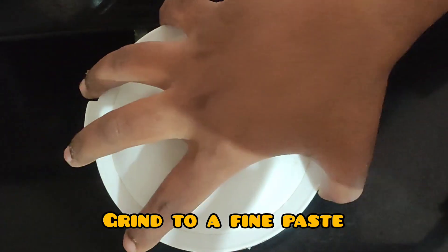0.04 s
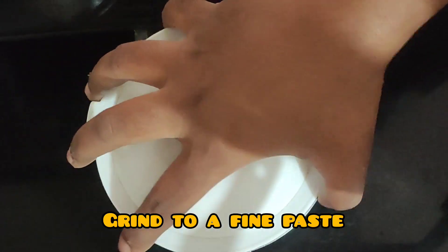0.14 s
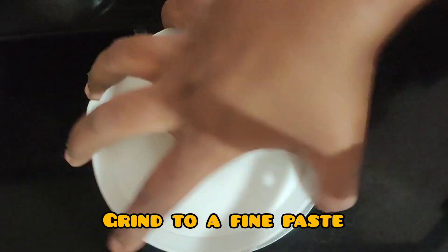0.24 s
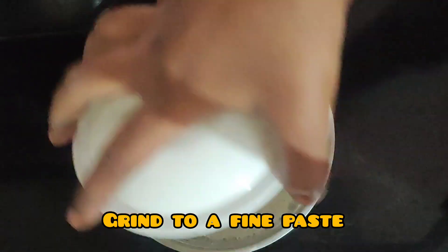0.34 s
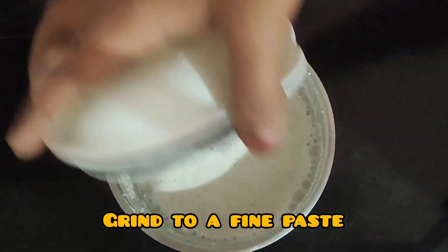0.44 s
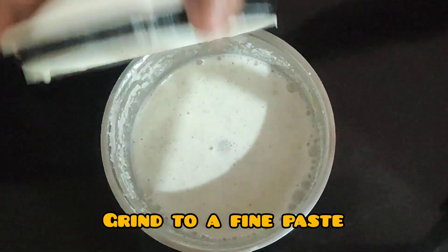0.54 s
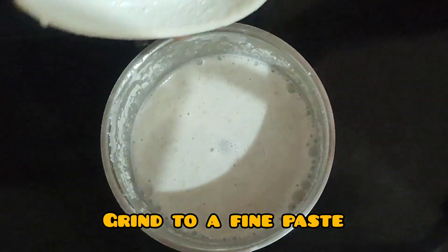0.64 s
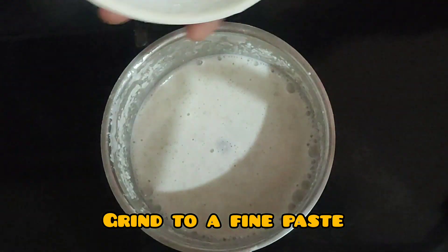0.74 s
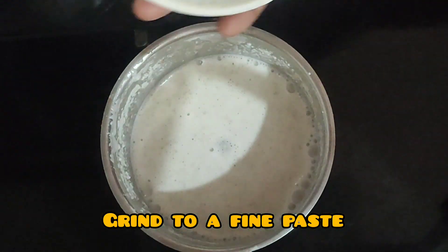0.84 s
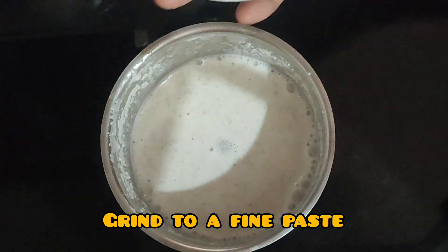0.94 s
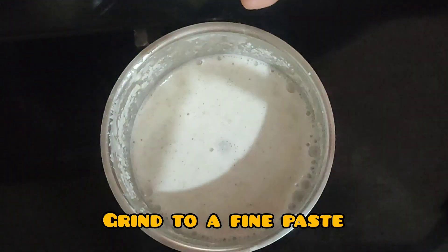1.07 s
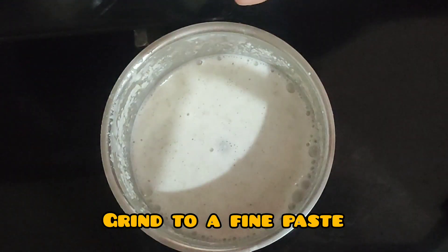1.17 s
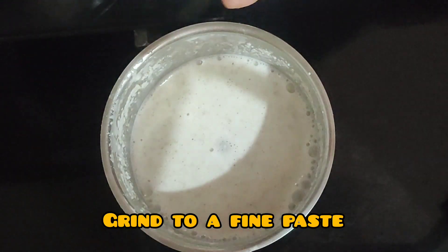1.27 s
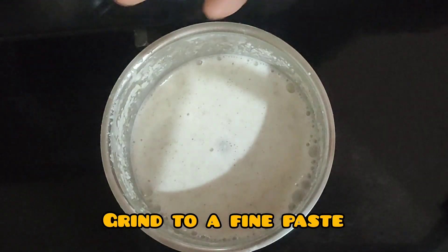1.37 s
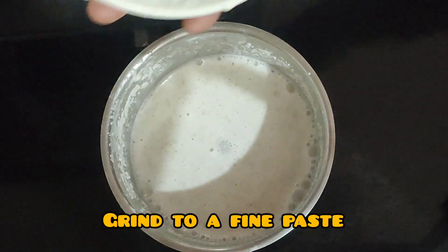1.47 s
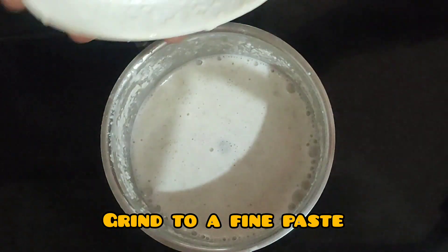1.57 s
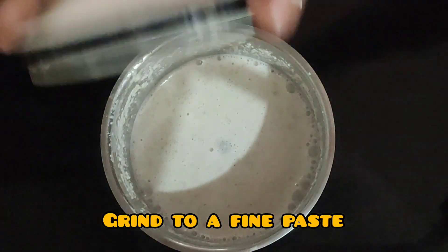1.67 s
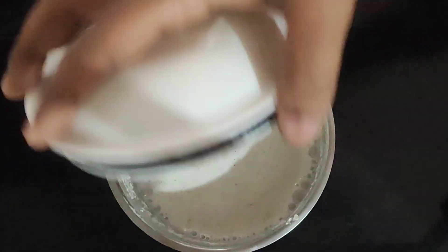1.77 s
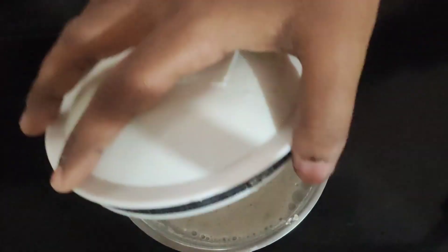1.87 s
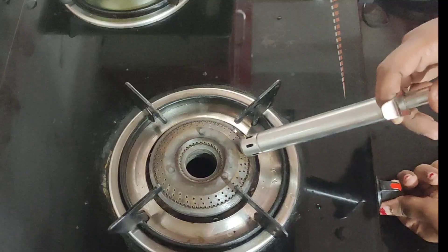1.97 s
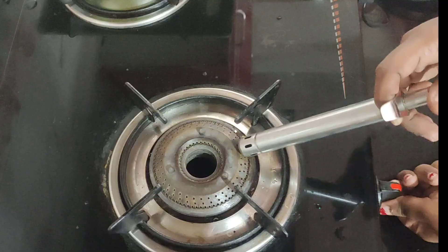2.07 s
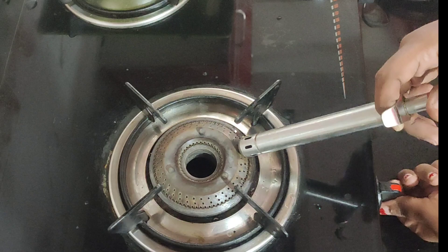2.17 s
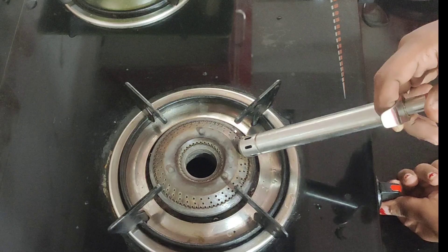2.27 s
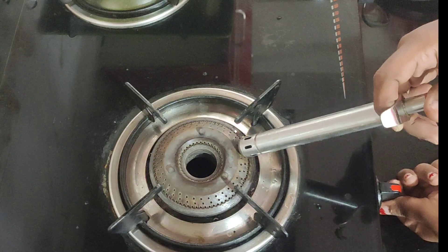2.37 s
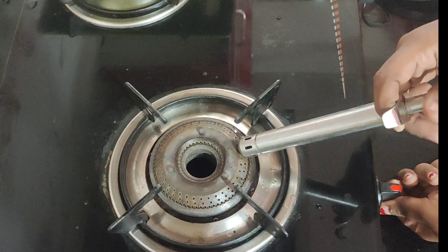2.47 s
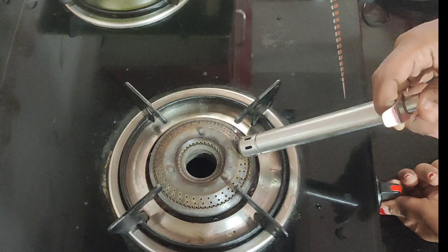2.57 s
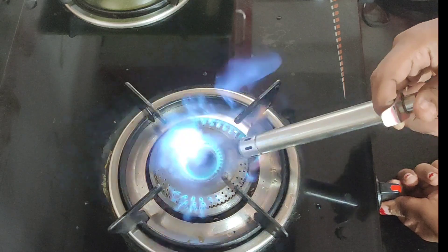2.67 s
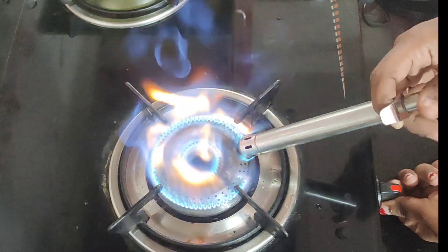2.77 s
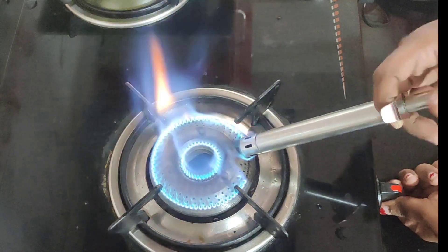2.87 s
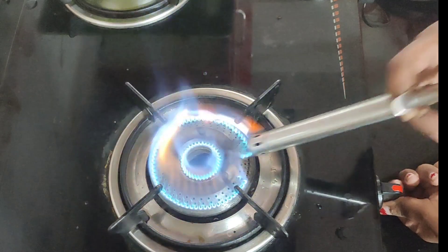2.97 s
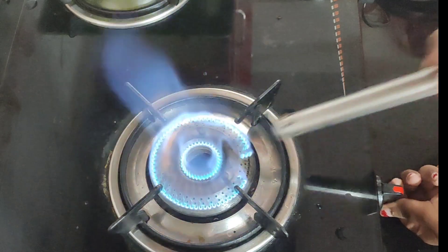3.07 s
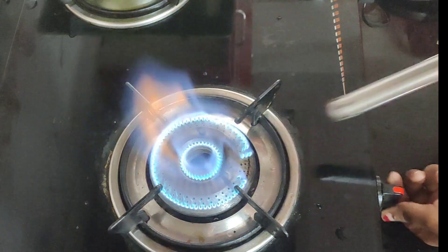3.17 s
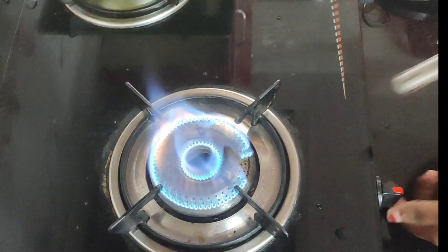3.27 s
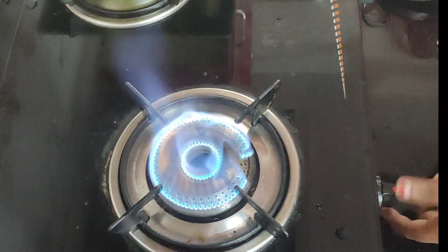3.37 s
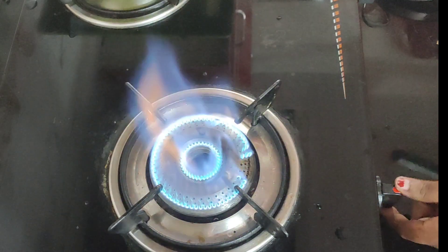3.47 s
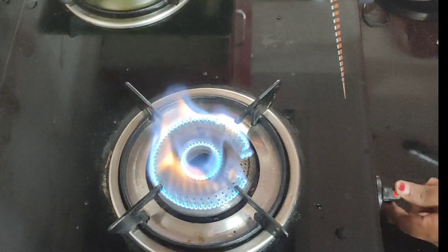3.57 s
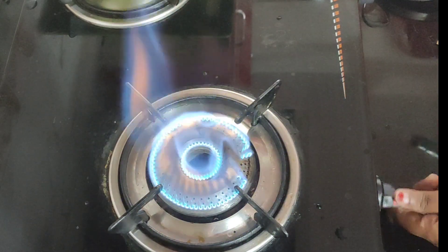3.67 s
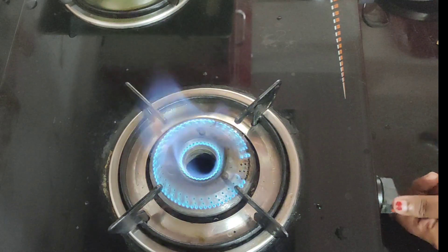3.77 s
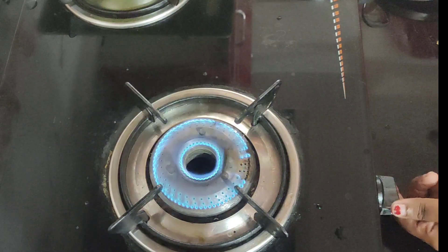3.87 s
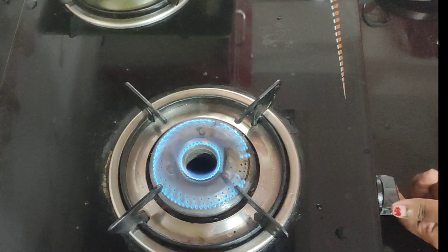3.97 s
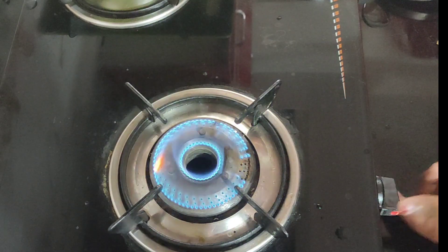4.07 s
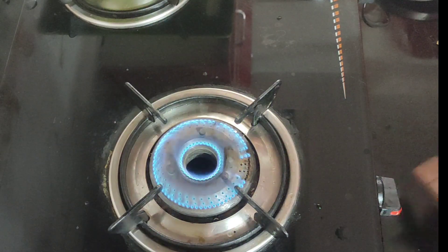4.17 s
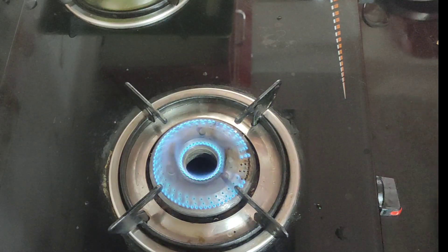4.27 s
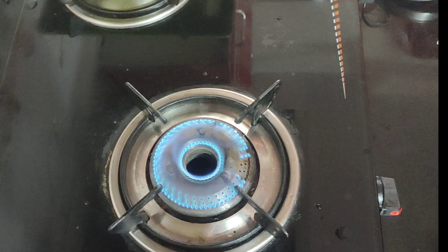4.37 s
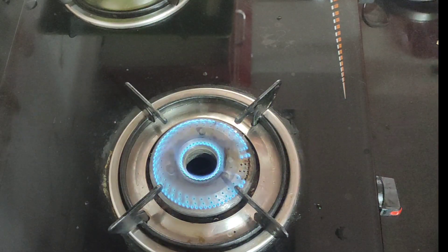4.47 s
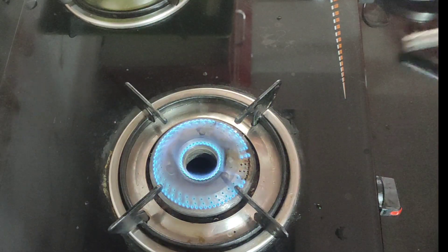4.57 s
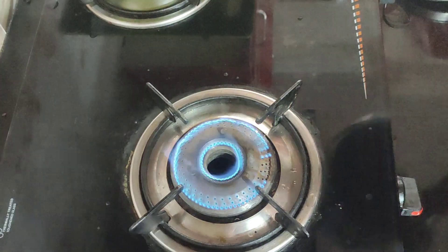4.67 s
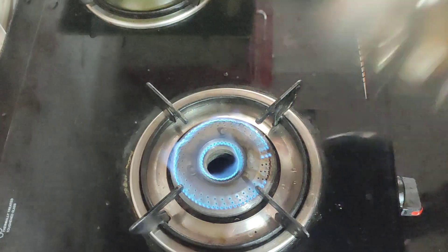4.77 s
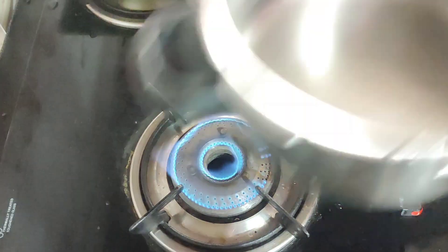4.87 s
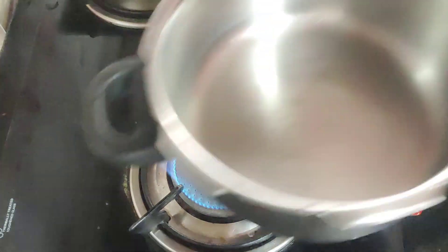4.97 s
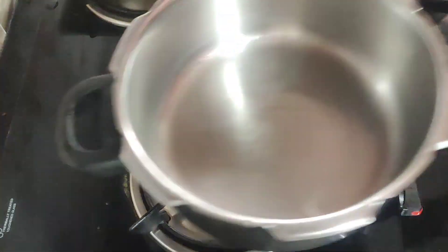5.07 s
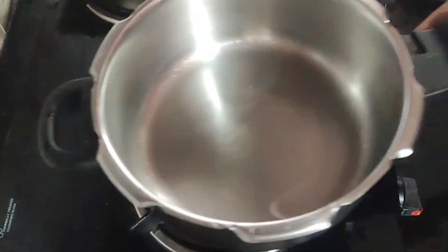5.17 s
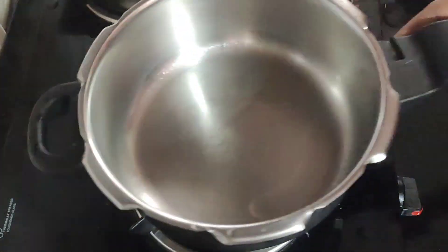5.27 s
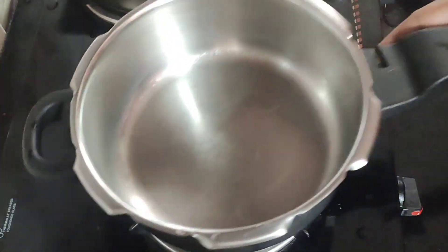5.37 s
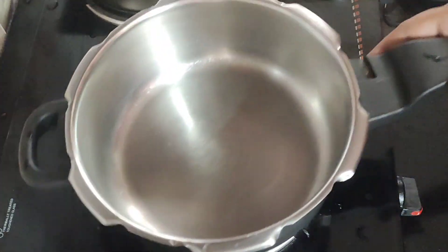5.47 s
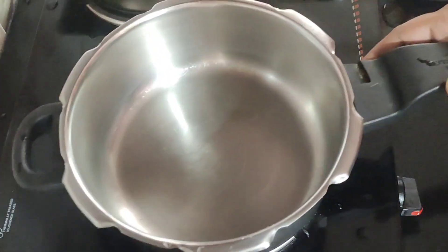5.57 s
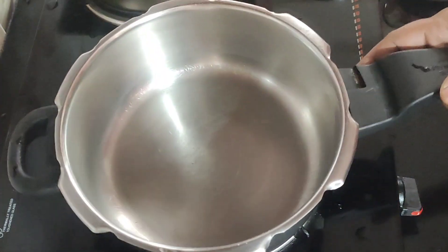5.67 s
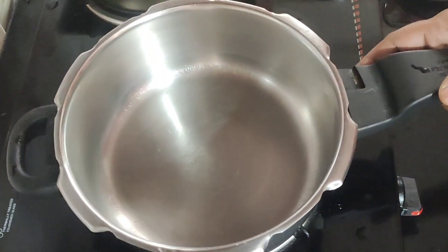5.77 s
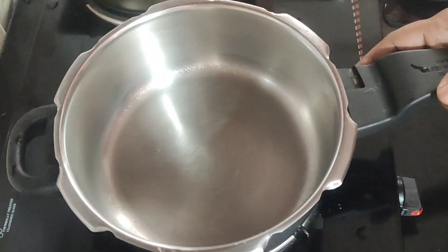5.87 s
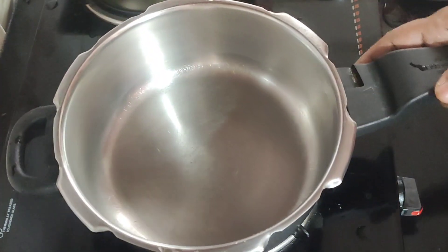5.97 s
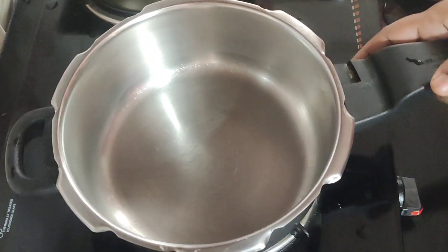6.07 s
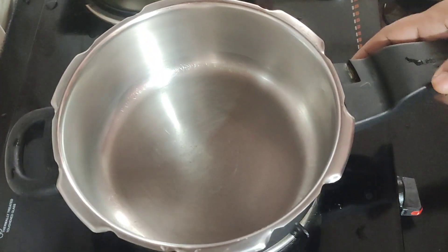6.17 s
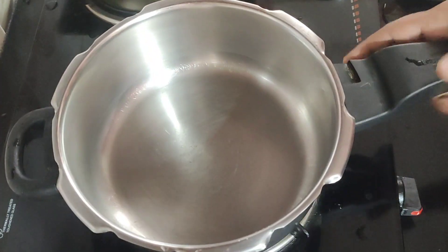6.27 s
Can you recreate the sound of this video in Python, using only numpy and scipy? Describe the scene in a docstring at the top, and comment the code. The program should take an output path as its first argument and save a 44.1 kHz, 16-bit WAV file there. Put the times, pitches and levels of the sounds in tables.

```python
"""Kitchen burner and pot

A small hard-walled kitchen heard at two microphone ports. A jar lid clinks, a gas knob clicks, a spark lighter
snaps and the burner lights; then a steel pot touches its cast-iron pan rest, rocks and settles.
Contacts are noise bursts through resonances, with a fading noise tail for the walls. The flame is a train of low
puffs over a roar. Far taps and soft hisses pass; rumble, hum and hiss lie beneath, with two brief dips to silence."""
import sys
import numpy as np
from scipy import signal
from scipy.fft import rfft, irfft, next_fast_len
from scipy.io import wavfile
from scipy.ndimage import uniform_filter1d, map_coordinates

SR = 44100
rng = np.random.default_rng(int(sys.argv[2]) if len(sys.argv) > 2 else 0)


def int16_out(signal):
    """Quantize to a 16-bit WAV file."""
    q = np.round(np.clip(np.atleast_2d(signal).T, -1, 1) * 32767)
    wavfile.write(sys.argv[1], SR, q.astype(np.int16))


N = 279076

# brief dips to silence between stretches of room sound: (centre [s], half width [s])
DIPS = [(1.934, 0.0047), (4.643, 0.0058)]


def pot(out):
    """Each touch knocks the cast-iron rest and rings the steel pot's modes at new strengths."""
    # touches of the pan rest: (time [s], level [dB], rattle [s], contact [ms], stove level [dB], ring level [dB])
    touches = [(5.510, -14.5, .012, 0.0094, 7, 15.5), (5.5396, -10.5, 0.0037, 0.025, 3, 8.5),
               (5.550, -27, 0.006, 0.025, 0, 21), (5.6736, -31.5, 0.02, 0.077, 6, 15),
               (5.693, -31, .019, 0.011, 0, 6), (5.699, -33.5, 0.024, 0.031, 3, 5),
               (5.708, -19, 0.0023, 0.07, 6, 19.5), (5.8345, -33.5, 0.0044, 0.092, 5.5, 3.5),
               (6.241, -41.5, 0.011, 0.042, 18.5, 12)]
    # pitches of the pot's modes: [Hz]
    steel_hz = [2277, 2433, 2541, 2627, 2657, 2705, 3741, 3959, 4083, 4124, 4153, 4235, 4735, 5130, 5605,
                5696, 6051, 6083, 6700, 7276, 7432, 7615, 8188, 9189, 9765, 10400, 10710, 11850, 12300,
                12650]
    # strength and decay of the same modes: (level [dB], t60 [s])
    steel_modes = [(-22, .2), (-24, .2), (-21, 0.11), (-22, 0.42), (-6, 0.063), (-5.5, 0.2), (-6, 0.21),
                   (-6, .2), (-6.5, 0.26), (-2.5, 0.24), (-1, 0.32), (-10.5, .18), (-8, 0.19), (-19, .1),
                   (1, 0.19), (-14, 0.18), (3, 0.12), (-11, 0.21), (-7, .15), (-9, 0.23), (-11.5, 0.22),
                   (-5, 0.24), (-2, 0.35), (-15, 0.18), (-7.5, .2), (-12.5, .17), (-23, 0.13), (-18, 0.17),
                   (-17, .18), (-20, 0.18)]
    # broad humps under the pot's ring and a deep thud: (centre [Hz], width [Hz], level [dB])
    broad_modes = [(51.3, 16, -5), (2576, 143, 11), (4140, 190, 3), (5640, 88, -4), (5840, 160, 7.5)]
    # a round pot splits each mode in two: spread of the twin's pitch (share), twin level (dB)
    twin_split, twin_db = 0.0078, 2.5

    mode_db, t60_s = np.transpose(steel_modes)
    width_hz = np.log(1000) / np.pi / t60_s  # a mode that dies fast is broad
    for s, db, rattle_s, contact_ms, stove_db, ring_db in touches:
        luck = rng.standard_normal((4, len(steel_modes)))
        struck_db = ring_db + mode_db + 2 * luck[:3]
        # drawn afresh for each touch, for a denser, less regular ring
        twin_hz = steel_hz * (1 + twin_split * luck[3])
        free = zip(steel_hz, width_hz, struck_db[0])
        twin = zip(twin_hz, 1.2 * width_hz, struck_db[2] + twin_db)
        # the part of each mode that the seat damps at once
        held = zip(steel_hz, 6 * width_hz, struck_db[1] - 9)
        body = broad_modes + [*free, *twin, *held]
        touch = knock(body, rattle_s, contact_ms, stove_db, crack_db=-15.5)
        add(out, s, amp(db) * touch, pan_db=-0.5, lag_s=-0.00027, room_db=-4.5)


def lighter(out):
    """The spring hammer hits the lighter's tube and bounces; the button ticks as it springs back."""
    # hit and bounce: (time [s], level [dB], rattle [s], contact [ms], left-right [dB], stove level [dB])
    hits = [(2.667, -6, 0.00033, 0.0023, -10.5, 0), (2.6685, -10, 0.0029, 0.0083, 4.5, -2)]
    # resonances of the tube: (centre [Hz], width [Hz], level [dB])
    tube_modes = [(1980, 560, -3), (5160, 450, 3), (5840, 290, 4), (7350, 950, 0.5), (10050, 760, 3.5),
                  (11900, 3400, -0.5), (14400, 1500, -4)]
    # resonances of the button: (centre [Hz], width [Hz], level [dB])
    button_modes = [(1960, 320, 7), (3820, 480, 7), (5730, 540, -7), (7390, 550, 4.5), (11600, 3000, -8)]
    release_s, release_db = 2.95, -46

    for s, db, rattle_s, contact_ms, pan_db, stove_db in hits:
        snap = knock(tube_modes, rattle_s, contact_ms, stove_db, crack_db=-16)
        add(out, s, amp(db) * snap, pan_db, lag_s=0.00008, room_db=0)
    tick = knock(button_modes, rattle_s=0.005, contact_ms=0.0067, stove_db=-11.5, crack_db=-15)
    add(out, release_s, amp(release_db) * tick, pan_db=-6, lag_s=0.00008, room_db=4.5)


def flame():
    """The gas cloud burns off in a train of low puffs (short sine bursts) over a roar of low noise."""
    # the gas catches fire: (time [s], level [dB], pitch [Hz])
    puff_train = [(2.678, -32.5, 100), (2.704, -33.5, 158), (2.732, -31, 111), (2.736, -29.5, 47),
                  (2.76, -28, 107), (2.8, -31.5, 105), (2.844, -40, 114), (2.895, -42, 104)]
    puff_cycles = 0.82  # half length of a puff's bell, in cycles of its pitch
    port_phase, pan_db = 0.215, 0.3  # phase offset at each port (radians), left-right (dB)
    spark_s, blaze_s, hold_s, blaze_db = 2.667, 2.742, 0.047, -41.5  # starts at the spark, tops a little later
    rise_db_s, fall_db_s = 62, 112  # dB per second

    t = np.arange(N) / SR
    luck = rng.uniform(-0.9, 1, (len(puff_train), 2))
    port_sign = np.array([1, -1])[:, None, None]
    phase = np.pi * luck[:, :1] + port_phase * np.sign(luck[:, 1:]) * port_sign
    s, db, hz = (column[:, None] for column in np.transpose(puff_train))
    cycles = hz * (t - s)
    bell = amp(db) * np.exp(-(cycles / puff_cycles) ** 2)
    puffs = np.sum(bell * np.sin(2 * np.pi * cycles + phase), axis=1)

    blaze = (t > spark_s) * swell(blaze_s, hold_s, rise_db_s, fall_db_s)
    roar = amp(blaze_db) * blaze * diffuse(resonances([(179, 160, 0)]), patchy_db=2.5)
    return puffs * amp([[pan_db / 2], [-pan_db / 2]]) + roar


def knob(out):
    """The gas knob passes its detent: a click and a rebound shake the panel and stove."""
    # click and rebound: (time [s], level [dB], rattle [s], contact [ms], left-right [dB], stove level [dB])
    clicks = [(1.995, -26.5, 0.0092, 0.018, -3.5, 2.5), (2.0048, -31, 0.0031, 0.026, 9, 14)]
    # resonances of the knob and panel: (centre [Hz], width [Hz], level [dB])
    panel_modes = [(157, 60, 2), (1810, 39, 8), (3165, 1270, -5.5), (4670, 640, -25), (6700, 900, -15.5),
                   (10900, 650, -5)]
    for s, db, rattle_s, contact_ms, pan_db, stove_db in clicks:
        click = knock(panel_modes, rattle_s, contact_ms, stove_db, crack_db=-34)
        add(out, s, amp(db) * click, pan_db, lag_s=0.00014, room_db=0.5)


def clink(out):
    """A tiny bright tick of metal as the jar lid comes off: high resonances struck very briefly."""
    # resonances of the lid: (centre [Hz], width [Hz], level [dB])
    lid_modes = [(6600, 200, -11), (8150, 220, -6), (11900, 60, 9), (13800, 60, -3), (15250, 55, -14)]
    clink_s, clink_db = 0.437, -56
    tick = knock(lid_modes, rattle_s=0.002, contact_ms=0.003, stove_db=-40, crack_db=-25)
    add(out, clink_s, amp(clink_db) * tick, pan_db=0, lag_s=0, room_db=-2)


def taps(out):
    """Faint far taps, each a dull knock with one resonance, heard mostly off the walls."""
    # taps: (time [s], level [dB], rattle [s], ring [Hz], ring width [Hz], ring level [dB], contact [ms],
    # left-right [dB])
    far_taps = [(3.049, -49.5, 0.037, 3170, 300, 1, .04, -2),
                (3.894, -48.5, 0.014, 1580, 90, 14.5, 0.08, -6)]
    for s, db, rattle_s, hz, width_hz, ring_db, contact_ms, pan_db in far_taps:
        body = [(hz, width_hz, ring_db), (1700, 1600, 0)]
        tap = knock(body, rattle_s, contact_ms, stove_db=-18, crack_db=-15)
        add(out, s, amp(db) * tap, pan_db, lag_s=0, room_db=5.5)


def swish():
    """Two short soft hisses: bright noise that swells and fades straight in dB."""
    # hisses: (start of hold [s], hold [s], level [dB])
    hisses = [(4.155, .24, -66.5), (5.015, 0.23, -58.5)]
    # their relative spectrum: (frequency [Hz], level [dB])
    swish_colour = [(1200, -35), (3000, -5.5), (7000, -3), (12000, -4.5), (15300, -10), (15700, -41)]
    rise_db_s, fall_db_s = 396.5, 300  # dB per second
    level = sum(amp(db) * swell(s, hold_s, rise_db_s, fall_db_s) for s, hold_s, db in hisses)
    return level * diffuse(lambda hz: amp(along(swish_colour, hz)), patchy_db=3.5)


def air():
    """Street rumble, a broad hum and room hiss: coloured noises with slowly wandering levels."""
    # room levels in each stretch between dips: (rumble [dB], hum [dB], hiss [dB])
    room_levels = [(-54, -60, -55), (-54, -65.5, -55), (-53.5, -66.5, -55)]
    # relative spectrum of the street rumble: (frequency [Hz], level [dB])
    rumble_colour = [(5, -16), (10, 6), (18, -4), (27, -18), (45, -4), (68, -14), (97, -6.5), (135, -13),
                     (160, -16), (230, -20), (320, -44), (550, -120)]
    # resonances of the hum: (centre [Hz], width [Hz], level [dB])
    hum_modes = [(260, 21, -2), (333.8, 30, 4.5)]
    # relative spectrum of the hiss: (frequency [Hz], level [dB])
    hiss_colour = [(120, -21), (200, -17.5), (322, -4.5), (387, -8), (448, -3.5), (722, -5.5), (777, -7),
                   (1420, -11), (1560, -11.5), (5520, -25), (6400, -23.5), (9060, -31.5), (13600, -34),
                   (15300, -37), (15700, -68)]
    drift_db, drift_per_s = -0.52, 1.67  # scale of the wander, knots per second

    stretch = np.searchsorted([s for s, half in DIPS], np.arange(N) / SR)
    # each layer wanders on its own
    rumble_db, hum_db, hiss_db = (db[stretch] + drift_db * wander(drift_per_s)
                                  for db in np.transpose(room_levels))
    rumble = amp(rumble_db) * diffuse(lambda hz: amp(along(rumble_colour, hz)), patchy_db=0.1)
    hum = amp(hum_db) * diffuse(resonances(hum_modes), patchy_db=0.5)
    hiss = amp(hiss_db) * diffuse(lambda hz: amp(along(hiss_colour, hz)), patchy_db=1.5)
    return rumble + hum + hiss


def knock(body, rattle_s, contact_ms, stove_db, crack_db):
    """A fading rattle of contacts shakes a body and the stove; a longer contact is duller."""
    # every contact also knocks the sheet-metal stove top: (centre [Hz], width [Hz], level [dB])
    stove_modes = [(271.3, 25, -1), (489.4, 60, -5), (701, 95, 1.5), (911, 100, 1.5), (1300, 230, -3.5),
                   (2003, 32, 0)]
    t = np.arange(SR * 2 // 5) / SR
    fading = amp(-10 * t / rattle_s)
    noise = rng.standard_normal((3, len(t)))
    shake = (noise[0] + 0.79 * noise[1:]) * fading ** 2  # each port sees the parts from its own side
    z = rfft(shake)
    shake = irfft(z / np.abs(z), len(t)) * fading  # the contacts favour no pitch

    def response(hz):
        parts = resonances(body)(hz) + amp(stove_db) * resonances(stove_modes)(hz) + amp(crack_db)
        return parts / (1 + 2j * np.pi * hz * contact_ms / 1000) ** 2

    x = filtered(shake, response)
    # scaled so that the whole energy, spread over the rattle time, has rms 0.5
    return x / np.sqrt(np.mean(x ** 2) * len(t) / (rattle_s * SR)) / 2


def add(out, s, x, pan_db, lag_s, room_db):
    """Places a sound at the two ports (left late by lag) with a fresh noise tail as the walls' answer."""
    # decay of the room: (frequency [Hz], t60 [s])
    wall_decay = [(150, 0.525), (1000, 0.37), (4000, 0.37), (12000, 0.28)]
    hz, t, z = signal.stft(rng.standard_normal((2, SR // 2)), SR, nperseg=256)
    decay = amp(-60 * t / along(wall_decay, hz)[:, None])
    tail = signal.istft(z * decay, SR, nperseg=256)[1]
    tail = at_ports(tail, np.ones_like)
    x = np.pad(np.broadcast_to(x, (2, x.shape[-1])), ((0, 0), (0, SR // 2)))
    wet = signal.fftconvolve(x, tail / np.linalg.norm(tail[0]), axes=1)[:, :x.shape[1]]
    both = x * amp([[pan_db / 2], [-pan_db / 2]]) + amp(room_db) * wet
    both[0] = np.roll(both[0], round(lag_s * SR))
    start = round(s * SR)
    out[:, start:start + both.shape[1]] += both[:, :N - start]


def diffuse(gain, patchy_db):
    """Coloured noise from all sides, uneven over time and pitch, rms 1."""
    z = signal.stft(rng.standard_normal((2, N + 512)), nperseg=512)[2]
    field = uniform_filter1d(rng.standard_normal(z.shape[1:]), size=5, axis=0)  # across pitch
    field = uniform_filter1d(field, size=12, axis=1)  # across time
    noise = signal.istft(z * amp(patchy_db * unit(field)), nperseg=512)[1][:, :N]
    return unit(at_ports(noise, gain))


def at_ports(pair, gain):
    """Two unrelated noises coloured and mixed as sound from all sides: the ports agree only on long waves."""
    ports_m, sound_m_s = 0.155, 343  # port spacing (m), speed of sound (m/s)

    def response(hz):
        turn = np.arccos(0.9 * np.sinc(2 * hz * ports_m / sound_m_s)) / 2
        return gain(hz) * np.array([np.cos(turn), np.sin(turn)])

    mid, side = filtered(pair, response)
    return np.array([mid + side, mid - side])


def resonances(peaks):
    """Causal response of damped resonances (Hz, width Hz, dB), alternating in sign."""
    return lambda f: sum((-1) ** k * amp(db) * 1j * f * w / (c * c - f * f + 1j * f * w)
                         for k, (c, w, db) in enumerate(peaks))


def filtered(x, response):
    """x through a complex response of frequency, applied to its padded spectrum."""
    n = x.shape[-1]
    m = next_fast_len(n + 8192)
    return irfft(rfft(x, m) * response(np.fft.rfftfreq(m, 1 / SR)), m)[..., :n]


def swell(start, hold, rise_db_s, fall_db_s):
    """Gain that climbs to 1 at start, holds, and falls away, straight in dB."""
    t = np.arange(N) / SR - start
    return amp(np.minimum(rise_db_s * t, 0) - fall_db_s * np.maximum(t - hold, 0))


def wander(rate):
    """A smooth random curve, rate knots a second."""
    knots = rng.standard_normal(int(N * rate / SR) + 4)
    return map_coordinates(knots, [np.arange(N) * rate / SR])


def along(points, hz):
    """Interpolates (Hz, value) points on a log frequency axis."""
    f, v = np.transpose(points)
    return np.interp(np.log(hz + 1), np.log(f + 1), v)


def unit(x):
    """x at rms 1."""
    return x / np.sqrt(np.mean(x ** 2) + 1e-20)


def amp(db):
    """Gain of a level in dB."""
    return 10 ** (np.asarray(db) / 20)


def scene():
    """All sources at the two ports."""
    out = air() + swish() + flame()
    for source in (knob, lighter, taps, pot, clink):
        source(out)
    return out


def record(dry):
    """The level dips quickly to silence and back at each dip; nothing is kept above the band limit."""
    top_hz = 16200
    t = np.arange(N) / SR
    for s, half in DIPS:
        dry = dry * np.clip(np.abs(t - s) / half, 0, 1)
    return filtered(dry, lambda hz: hz < top_hz)


dry = scene()
out = record(dry)
int16_out(out)
```